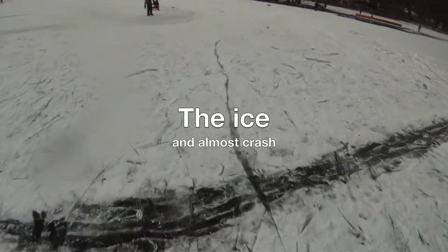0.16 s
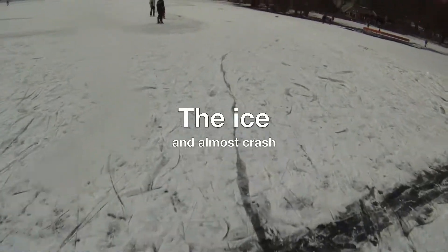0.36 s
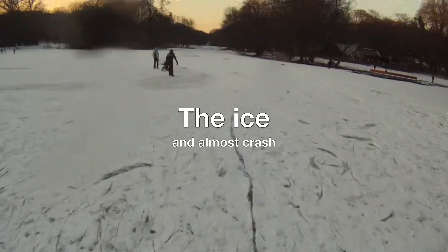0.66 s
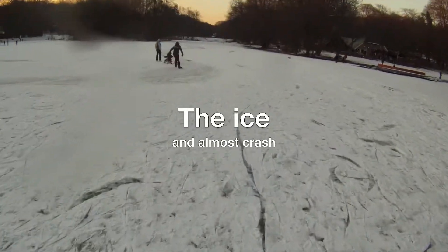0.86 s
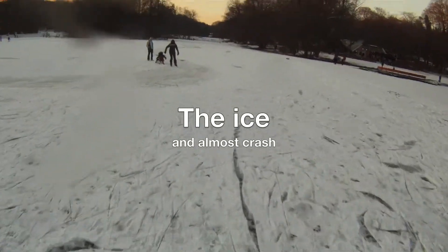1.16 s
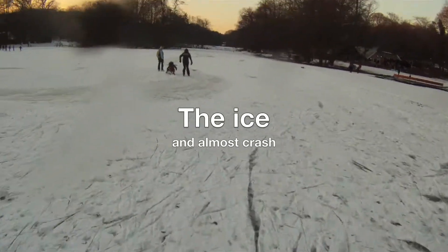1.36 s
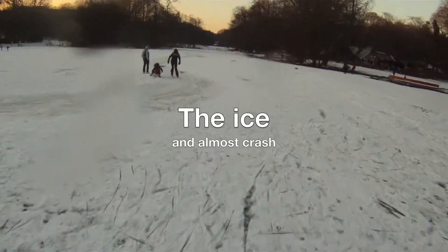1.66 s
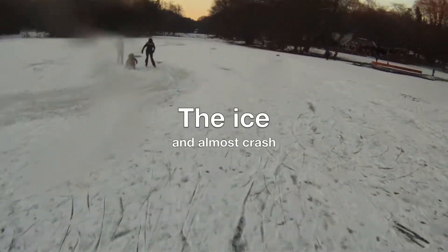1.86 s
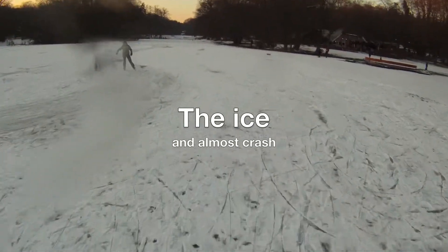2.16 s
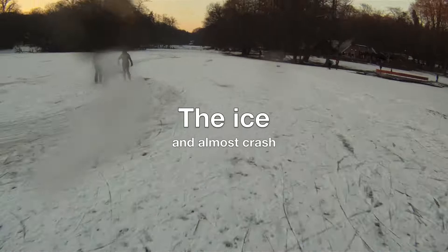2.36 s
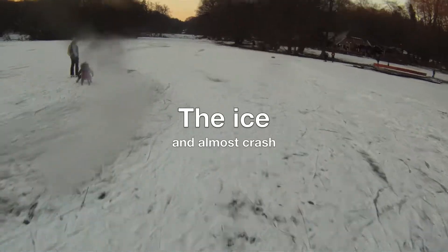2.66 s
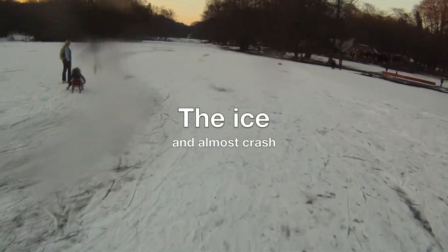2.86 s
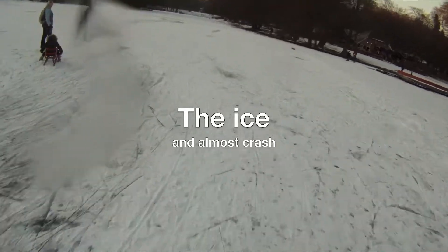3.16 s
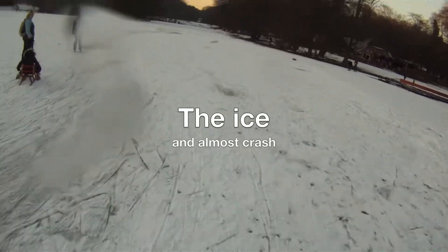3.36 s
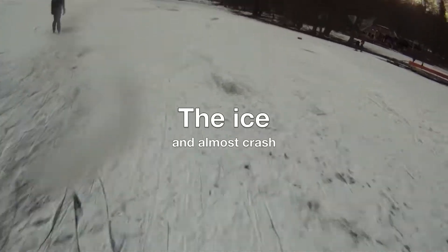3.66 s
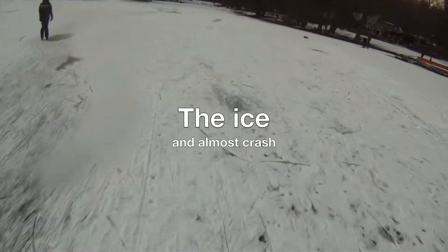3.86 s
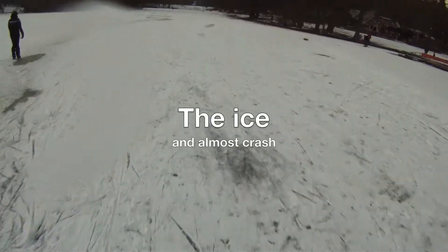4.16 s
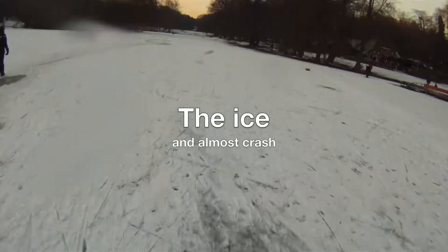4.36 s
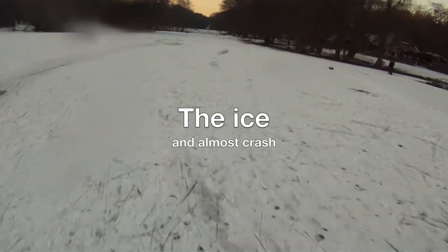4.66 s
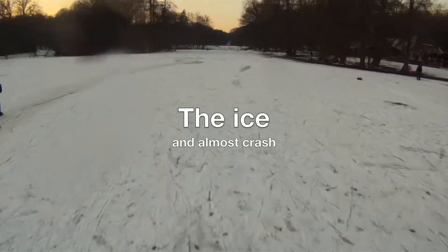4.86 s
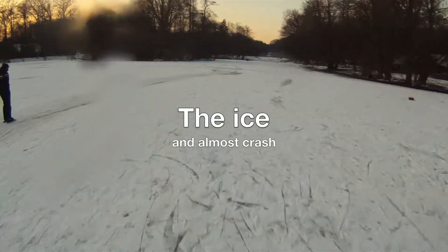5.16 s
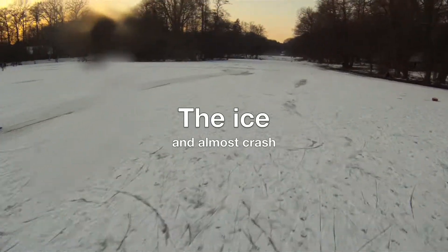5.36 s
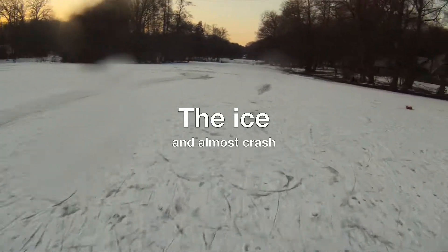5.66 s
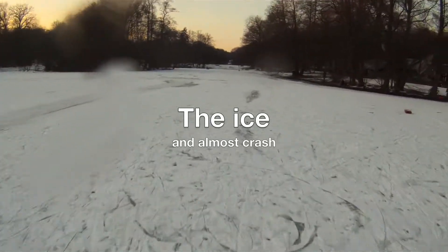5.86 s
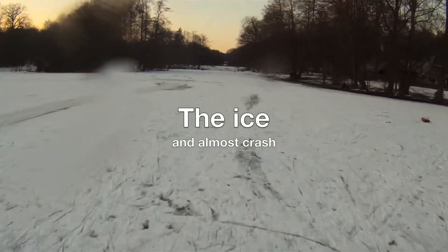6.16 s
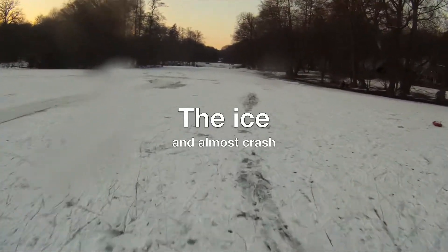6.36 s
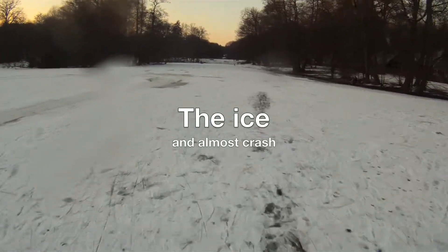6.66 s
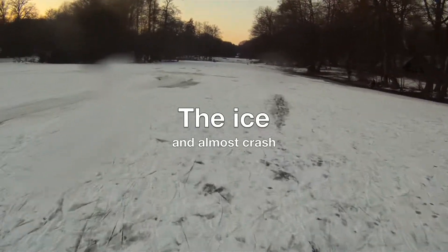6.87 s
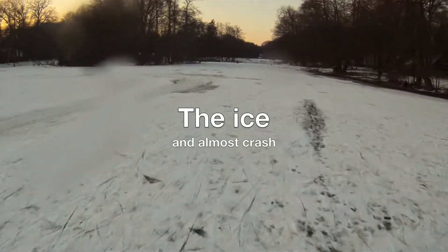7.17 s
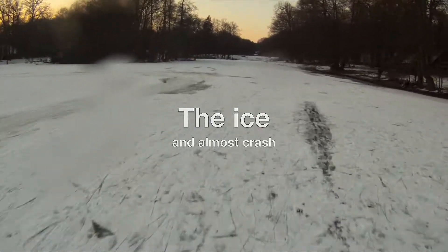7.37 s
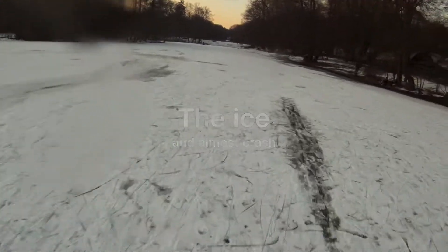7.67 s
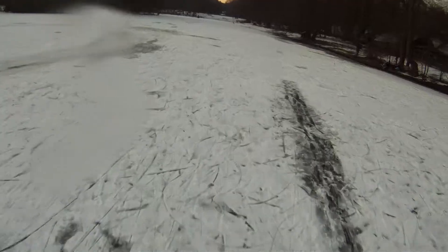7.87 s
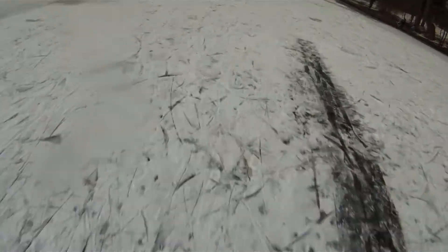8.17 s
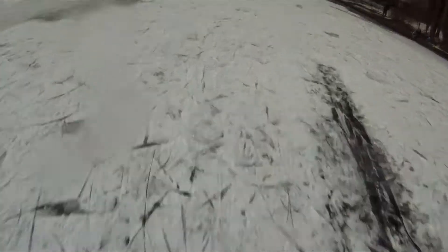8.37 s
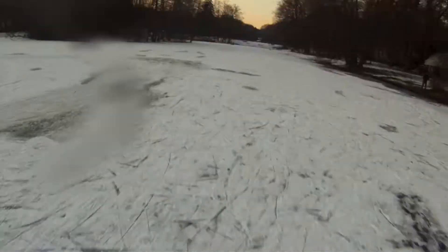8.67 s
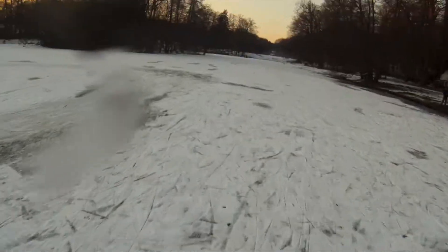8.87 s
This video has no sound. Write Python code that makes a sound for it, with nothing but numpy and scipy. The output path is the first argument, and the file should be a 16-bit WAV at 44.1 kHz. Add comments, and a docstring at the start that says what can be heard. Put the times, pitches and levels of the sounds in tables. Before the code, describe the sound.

Steel tyre spikes bite hard snow and ice in a dense, crackling mid-pitched hiss. Ice chips snap, patches grate briefly, and ridges give dull knocks. The low tyre hum builds into a rumble, while gusty wind surges and slams a camera microphone carried by the rider outdoors. Late buffets overload it and briefly push everything down.

```python
"""Spiked tyres on a frozen lake

A bicycle on spiked tyres rolls over a snowy frozen lake, heard from a camera on the rider.
Steel spikes crunch, snap and scrape in the ice: impacts and noise excite resonances and coloured responses.
Blows on the tyres make a low roar with dull knocks; shaped noise and single pulses make the headwind.
Gain control ducks after strong peaks, and a coarse sample-and-hold adds a thin fizz on top."""
import sys
import numpy as np
from scipy import signal
from scipy.fft import rfft, irfft
from scipy.io import wavfile
from scipy.ndimage import uniform_filter1d

SR = 44100
rng = np.random.default_rng(int(sys.argv[2]) if len(sys.argv) > 2 else 0)


def inscribe(sig):
    """Save sig as 16-bit PCM at rate SR to the path in sys.argv[1].

    A 1-D sig is mono; a 2-D sig holds one channel per row.
    Samples are clipped to [-1, 1] before scaling.
    """
    pcm = np.round(np.clip(np.atleast_2d(sig).T, -1, 1) * 32767)
    wavfile.write(sys.argv[1], SR, pcm.astype(np.int16))


N = 398223

# base level of the crunch, lower where gain control ducks after strong wind blows: (time [s], level [dB])
CRUNCH_BASE = [(0.0, -51.5), (0.3, -47), (1.2, -46.5), (1.45, -49), (2.85, -48.5), (3.05, -46.5),
               (3.6, -51), (3.95, -46.5), (4.5, -46.5), (5.3, -45), (6.72, -44), (6.87, -47), (7.35, -43.5),
               (7.52, -47), (8.15, -44.5), (8.33, -48.5), (8.7, -49.5), (9.0, -47.5)]
# the spikes dig into a patch of hard ice: (start [s], length [s], level [dB])
HARD_PATCHES = [(0.451, 0.064, -44), (0.733, 0.1, -43), (0.91, 0.05, -50), (1.305, 0.036, -42.5),
                (1.486, 0.041, -42.5), (1.558, 0.081, -43), (1.68, 0.046, -43), (1.773, 0.02, -44),
                (1.928, 0.044, -45.5), (2.049, 0.079, -45.5), (2.296, 0.064, -43.5), (2.437, 0.19, -45),
                (2.707, 0.08, -46), (2.933, 0.035, -49), (3.254, 0.11, -47.5), (3.75, 0.034, -51),
                (3.966, 0.097, -43), (4.206, 0.06, -44), (4.505, 0.16, -45), (4.707, 0.055, -45.5),
                (4.925, 0.16, -44.5), (5.387, 0.068, -43.5), (8.013, 0.034, -53), (8.732, 0.28, -44.5)]
# brief lulls in the crunch, some where gain control ducks after a buffet:
# (middle [s], length [s], deepest drop [dB])
CRUNCH_LULLS = [(1.44, 0.15, 2), (2.186, 0.14, 2), (4.47, 0.1, 5), (5.102, 0.08, 3.5), (5.68, 0.056, 8),
                (7.77, 0.081, 2.5)]


def bite(uneven_db=1.72, uneven_hz=16):
    """Load modulation: base and hard patches add in power, then lulls and uneven ice vary the gain."""
    load_db = uneven_db * flutter(uneven_hz)
    for middle, length, drop_db in CRUNCH_LULLS:
        dip = np.hanning(round(length * SR))
        add(load_db, middle - length / 2, -drop_db * dip)
    loudness = swelling(CRUNCH_BASE, HARD_PATCHES, rise_s=0.013, fall_s=0.018)
    return loudness * gain_of(load_db)


# colour of the crunching ice: (frequency [Hz], relative level per hertz [dB])
CRUNCH_COLOUR = [(470, -31.5), (800, -6.5), (1040, -9), (1220, -4), (1540, -5), (1980, -4), (2180, -1.5),
                 (2390, -3), (2630, -1), (3080, -4), (3480, -9.5), (3910, -10), (4240, -12.5), (4920, -11),
                 (5700, -19.5), (7410, -72), (12500, -120)]
# resonances of the camera's case: (frequency [Hz], width [Hz], boost [dB])
CASE_RESONANCES = [(1250, 150, 2.5), (2180, 170, 2.5), (2620, 190, 1.5), (3020, 220, 2.0)]
# colour of a breaking chip, also used by snaps(): (frequency [Hz], relative level per hertz [dB])
CHIP_COLOUR = [(300, -39), (800, -10.5), (1300, -12), (2200, -7.5), (3100, -10), (3600, -29), (4900, -20),
               (5800, -38.5)]


def spikes(count=16, tick_width_hz=170, click_share=0.27, patchy_db=-1.0, snow_share=0.45,
           clumps_db=0.5, clump_hz=70, chip_share=0.32):
    """Impact excitation of resonances: ticks at many pitches join the finer hiss of crushed snow."""
    ticks = np.zeros(N)
    for pitch_hz in np.linspace(1000, 5300, count):
        patches = gain_of(patchy_db * flutter(10))
        clicks = impacts(per_s=110, spread_db=1.0) * patches
        ticks += resonate(clicks, pitch_hz, tick_width_hz)
        ticks += click_share * clicks
    snow = snow_share * rng.standard_normal(N)
    clumps = gain_of(clumps_db * flutter(clump_hz))
    grains = (evened(ticks) + snow) * clumps
    crunch = steadied(ring(grains, response(CRUNCH_COLOUR, CASE_RESONANCES)), size=2500)
    # a few spikes break tiny chips, which crack more sharply
    cracks = impacts(per_s=77, spread_db=5.0)
    chips = evened(ring(cracks, response(CHIP_COLOUR, CASE_RESONANCES)))
    return bite() * (crunch + chip_share * chips)


# the biggest chips of ice snapping under a spike: (time [s], peak level before trim_db [dB])
BIG_CHIPS = [(0.654, -32.5), (0.668, -21.5), (0.8862, -26), (1.274, -24.5), (1.285, -26.5), (1.502, -24),
             (1.5201, -22.5), (1.6033, -22.5), (1.749, -23), (1.788, -24), (1.941, -26), (2.344, -27.5),
             (2.444, -30.5), (4.04, -23), (4.045, -23.5), (4.148, -26), (4.354, -21.5), (4.5646, -19),
             (4.6447, -20), (4.777, -22), (4.945, -26), (4.973, -28), (5.2966, -27), (5.306, -23),
             (5.42, -27), (5.7, -22), (5.9358, -23), (6.0542, -21), (6.5016, -23), (6.8494, -20),
             (6.857, -21), (7.099, -23.5), (7.2523, -21), (7.3217, -24), (7.346, -21), (8.147, -19),
             (8.1547, -23), (8.402, -22), (8.7496, -22.5)]


def snaps(trim_db=-2.0, crumbs=0.12, crumble_s=0.0035, size=1024):
    """Impulse response of brittle fracture: one sharp click and a few milliseconds of crumbling."""
    t = np.arange(size) / SR
    body = response(CHIP_COLOUR, CASE_RESONANCES)
    out = np.zeros(N)
    for s, peak_db in BIG_CHIPS:
        click = t == 0
        crumbling = crumbs * rng.standard_normal(size) * np.exp(-t / crumble_s)
        snap = signal.fftconvolve(click + crumbling, body)
        add(out, s, gain_of(peak_db + trim_db) * snap / abs(snap).max())
    return out


# short scrapes, and two long low grating noises near 1 kHz:
# (middle [s], length [s], pitch [Hz], level before the fades [dB])
SCRAPING_NOISES = [(0.47, 0.16, 3640, -49), (0.848, 0.13, 860, -46.5), (0.945, 0.048, 3820, -42.5),
                   (0.937, 0.095, 2750, -41), (1.114, 0.023, 2680, -43), (1.35, 0.06, 3930, -53),
                   (1.746, 0.044, 3820, -47), (1.795, 0.046, 3800, -53), (2.56, 0.18, 3450, -51.5),
                   (4.041, 0.023, 1430, -37), (6.078, 0.018, 1790, -37.5), (7.674, 0.03, 4170, -51),
                   (8.113, 0.28, 930, -45.5), (8.86, 0.3, 1000, -49)]


def scrapes(width_hz=520, slips_per_s=2500):
    """Resonant filtering of random slips: each scraping noise chatters around one pitch."""
    slipping = rng.random(N) < slips_per_s / SR
    chatter = rng.standard_normal(N) * slipping
    out = np.zeros(N)
    for middle, length, pitch_hz, level_db in SCRAPING_NOISES:
        slips = chatter[round(middle * SR):][:round(length * SR)]
        # the same resonance twice gives steeper skirts
        tone = resonate(slips, pitch_hz, width_hz)
        tone = resonate(tone, pitch_hz, width_hz)
        add(out, middle - length / 2, gain_of(level_db) * evened(tone) * np.hanning(len(tone)))
    return out


# roar of the rolling tyres, growing with speed: (time [s], level [dB])
ROAR = [(0.1, -47), (1.0, -43), (1.25, -43), (1.8, -38), (1.97, -34.5), (2.6, -40), (3.6, -32), (3.85, -33),
        (4.55, -32.5), (5.2, -33), (5.85, -30.5), (6.2, -32.5), (6.95, -30), (7.6, -31), (9.0, -32)]
# the wheels judder across a rut: (start [s], length [s], level [dB])
JUDDERS = [(3.94, 0.071, -25.5)]
# the tyres knock over ridges of ice: (time [s], peak level before knock_trim_db [dB])
RIDGES = [(2.008, -18), (2.28, -30), (3.387, -14), (3.571, -19), (4.278, -17), (6.378, -25), (6.963, -10.5),
          (7.0, -18), (8.071, -13), (8.415, -7.5)]
# colour of the hollow tyres: (frequency [Hz], relative level per hertz [dB])
TYRE_COLOUR = [(60, -23), (150, -3.5), (250, 3.5), (380, 1.5), (500, 1.5), (600, -4), (720, -12.5),
               (900, -20.5), (1400, -21.5), (2500, -80)]


def tyres(bumps_db=1.0, bump_hz=33, knock_trim_db=1.0, contact_s=0.0016):
    """Cavity filtering of impacts: knobs drum on rough ice, hollow tyres turn the blows into a roar."""
    body = response(TYRE_COLOUR)
    bumps = gain_of(bumps_db * flutter(bump_hz))
    blows = impacts(per_s=2000, spread_db=2.0) * bumps
    loudness = swelling(ROAR, JUDDERS, rise_s=0.021, fall_s=0.031)
    out = loudness * steadied(ring(blows, body), size=4000)
    # rubber meets a ridge softly, so the knock is dull
    knock = np.convolve(np.hanning(round(contact_s * SR)), body)
    knock /= abs(knock).max()
    for s, peak_db in RIDGES:
        add(out, s - contact_s / 2, gain_of(peak_db + knock_trim_db) * knock)
    return out


# single hard buffets of air: (time [s], approximate peak level [dB], half swing of the push [s])
AIR_BLOWS = [(2.182, -8.5, 0.0012), (2.873, -6, 0.0012), (3.225, -2.5, 0.0018), (3.338, -2, 0.0014),
             (3.778, -6, 0.0018), (3.876, -7, 0.0015), (4.686, -6.5, 0.001), (4.736, -1.5, 0.0015),
             (4.948, -9, 0.0011), (5.644, -2.5, 0.002), (6.792, -8, 0.00093), (6.971, -3, 0.00092),
             (7.439, -0.5, 0.0013), (7.688, 1, 0.0019), (8.154, -6, 0.0027), (8.243, 2.5, 0.0017),
             (8.375, 0.5, 0.0012), (8.435, 1, 0.0017), (8.549, 2, 0.0014)]


def buffets(suction=0.52):
    """Pressure pulse of a passing large eddy: a soft, longer suction, then a sharp push."""
    t = np.arange(-SR // 50, SR // 50) / SR
    out = np.zeros(N)
    for s, peak_db, half_swing in AIR_BLOWS:
        # share grows from suction to 1, so the push is both stronger and quicker
        push = (1 + np.tanh(2 * t / half_swing)) / 2
        share = suction + (1 - suction) * push
        u = t * share / half_swing
        pulse = share * u * np.exp((1 - u ** 2) / 2)
        add(out, s + t[0], gain_of(peak_db) * pulse)
    return out


# steady headwind between the gusts: (time [s], level before trim and surges [dB])
STEADY_WIND = [(0.03, -38.5), (0.17, -29), (1.45, -30.5), (1.65, -35), (2.3, -20.5), (2.8, -28), (3.2, -20),
               (5.2, -20.5), (5.45, -25), (6.15, -28.5), (6.65, -24), (7.3, -20.5), (9.0, -25)]
# gusts on top of it: (start [s], length [s], level before trim and surges [dB])
WIND_GUSTS = [(0.31, 0.78, -24.5), (1.902, 0.19, -19.5), (2.163, 0.23, -24.5), (2.82, 0.68, -23),
              (3.51, 0.19, -15.5), (3.94, 0.33, -18.5), (4.355, 0.31, -17), (4.823, 0.25, -15.5),
                       (5.548, 0.19, -16), (5.79, 0.16, -21.5), (6.27, 0.11, -22), (6.758, 0.38, -19),
              (7.372, 0.6, -17), (8.08, 0.55, -15), (8.71, 0.23, -19.5)]
# colour of wind at the camera: (frequency [Hz], relative level per hertz [dB])
EDDY_COLOUR = [(8.8, -63), (15, -11), (48, 1.5), (80, 3), (111, 1.5), (446, -17), (607, -24.5), (720, -35),
               (900, -38), (1170, -60), (1980, -120)]


def wind(trim_db=-0.5, lumps_db=2.5, eddy_hz=45, surge_db=1.34, surge_hz=14,
         sway_db=-28, sway_hz=62, sway_follow=0.25):
    """Turbulence as filtered noise: eddies strike in lumps; the deepest go on even between gusts."""
    body = response(EDDY_COLOUR)
    gust = swelling(STEADY_WIND, WIND_GUSTS, rise_s=0.049, fall_s=0.055)
    gust = gust * gain_of(surge_db * flutter(surge_hz))
    eddies = rng.standard_normal(N) * gain_of(lumps_db * flutter(eddy_hz))
    rumble = gain_of(trim_db) * gust * steadied(ring(eddies, body), size=3000)
    sway = evened(band(ring(rng.standard_normal(N), body), 0, sway_hz))
    # the small exponent makes the deep sway follow the gusts only weakly
    return rumble + gain_of(sway_db) * gust ** sway_follow * sway


def gain_of(db):
    """Logarithmic level: decibels to amplitude."""
    return 10 ** (np.asarray(db) / 20)


def evened(x):
    """Power normalisation: scales to an rms of 1."""
    return x / np.sqrt(np.mean(x ** 2) + 1e-20)


def steadied(x, size):
    """Envelope normalisation: evens out the slow level over size samples and leaves the fast grain."""
    power = uniform_filter1d(uniform_filter1d(x ** 2, size), size)
    return x / np.sqrt(power + 1e-20)


def level(curve):
    """Interpolation in decibels: a (time, level) curve as a gain for every sample."""
    return gain_of(np.interp(np.arange(N) / SR, *np.transpose(curve)))


def swelling(curve, events, rise_s, fall_s):
    """Addition of powers: a base level plus events that each rise, hold and fall away."""
    t = np.arange(N) / SR
    power = level(curve) ** 2
    for start, length, level_db in events:
        rise = np.clip((t - start) / rise_s, 0, 1)
        fall = np.clip(1 - (t - start - length) / fall_s, 0, 1)
        power += (gain_of(level_db) * rise * fall) ** 2
    return np.sqrt(power)


def add(mix, s, sound):
    """Superposition: mixes a sound in at time s."""
    part = mix[max(round(s * SR), 0):][:len(sound)]
    part += sound[:len(part)]


def band(x, low_hz, high_hz):
    """Ideal band-pass: keeps only what lies between two frequencies."""
    hz = np.fft.rfftfreq(N, 1 / SR)
    return irfft(rfft(x) * ((hz >= low_hz) & (hz <= high_hz)), N)


def flutter(rate_hz):
    """Band-limited noise: smooth chance of rms 1, mostly between a tenth of the rate and the rate."""
    hz = np.fft.rfftfreq(N, 1 / SR)
    high_pass = hz / (hz + rate_hz / 10)
    low_pass = 1 / (1 + (hz / rate_hz) ** 4)
    return evened(irfft(rfft(rng.standard_normal(N)) * high_pass * low_pass, N))


def impacts(per_s, spread_db):
    """Random point process: a train of tiny blows, most weak and a few strong."""
    strength = gain_of(spread_db * np.minimum(rng.exponential(1, N), 4))
    sign = rng.choice([-1, 1], N)
    struck = rng.random(N) < per_s / SR
    return strength * sign * struck


def resonate(x, hz, width_hz):
    """Damped oscillator: one resonance with a peak gain of about 1."""
    r = np.exp(-np.pi * width_hz / SR)
    pole = r * np.exp(2j * np.pi * hz / SR)
    return 2 * signal.lfilter([1 - r], [1, -pole], x).real


def response(colour, resonances=(), size=8192):
    """Minimum-phase response: the causal ring of a body with this colour and these resonances."""
    hz = np.fft.rfftfreq(size, 1 / SR)
    points, values = np.transpose(colour)
    db = np.interp(np.log(hz + 1), np.log(points), values)
    # beyond the last point it falls 40 dB per decade
    db -= 40 * np.log10(np.maximum(hz / points[-1], 1))
    for centre, width, boost in resonances:
        db += boost / (1 + (2 * (hz - centre) / width) ** 2)
    # the Hilbert transform of the log gain supplies the phase
    log_gain = np.log(gain_of(np.r_[db, db[-2:0:-1]]))
    spectrum = np.exp(np.conj(signal.hilbert(log_gain)))
    return np.fft.ifft(spectrum).real[:size // 2]


def ring(x, body):
    """Convolution: plays x through a body's response."""
    return signal.oaconvolve(x, body)[:N]


def scene():
    """Superposition: all the sounds of the tyres and the wind reach one microphone."""
    ice = spikes() + snaps() + scrapes()
    return (ice + tyres() + buffets() + wind())[None]


def limited(x, ceiling_db=-7.0, recovery_db_per_s=80, attack_s=0.0021):
    """Peak-hold gain control: the gain drops just after a peak and creeps back."""
    over_db = np.maximum(20 * np.log10(abs(x) + 1e-9) - ceiling_db, 0)
    recovery_db = np.arange(N) / SR * recovery_db_per_s
    held_db = np.maximum.accumulate(over_db + recovery_db) - recovery_db
    keep = np.exp(-1 / (attack_s * SR))
    reduction_db = signal.lfilter([1 - keep], [1, -keep], held_db)
    return x * gain_of(-reduction_db)


def record(dry, hold_hz=12000, edge_hz=15350):
    """Spectral imaging: after gain control, sample-and-hold mirrors the sound about its sampling rate."""
    x = band(limited(dry[0]), 0, hold_hz / 2)
    sampled = x * (1 + 2 * np.cos(2 * np.pi * hold_hz * np.arange(N) / SR))
    # holding each sample weights the spectrum by a sinc
    hold = np.sinc(np.fft.rfftfreq(N, 1 / SR) / hold_hz)
    held = irfft(rfft(sampled) * hold, N)
    return band(held, 0, edge_hz)[None]


dry = scene()
out = record(dry)
inscribe(out)
```